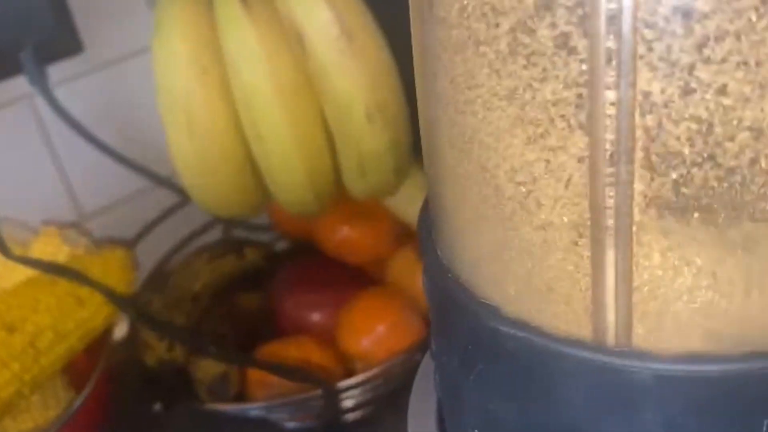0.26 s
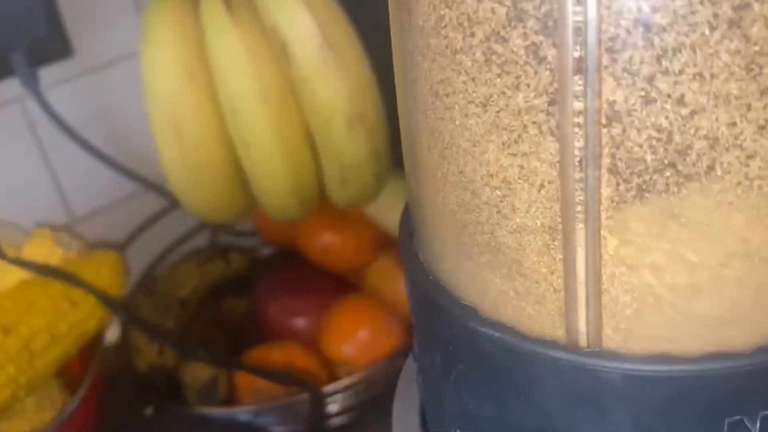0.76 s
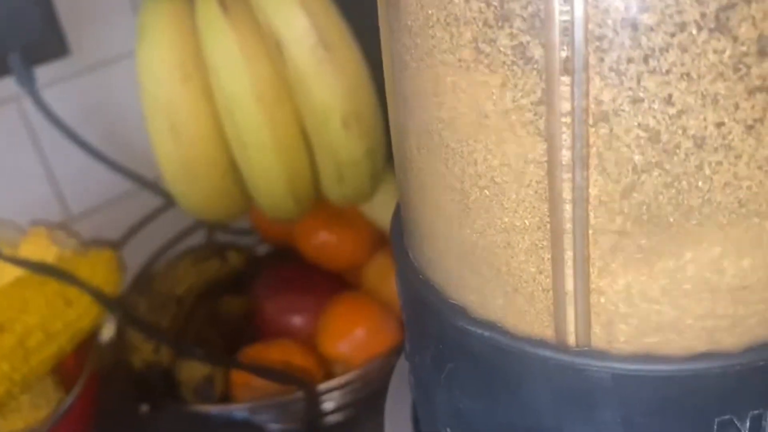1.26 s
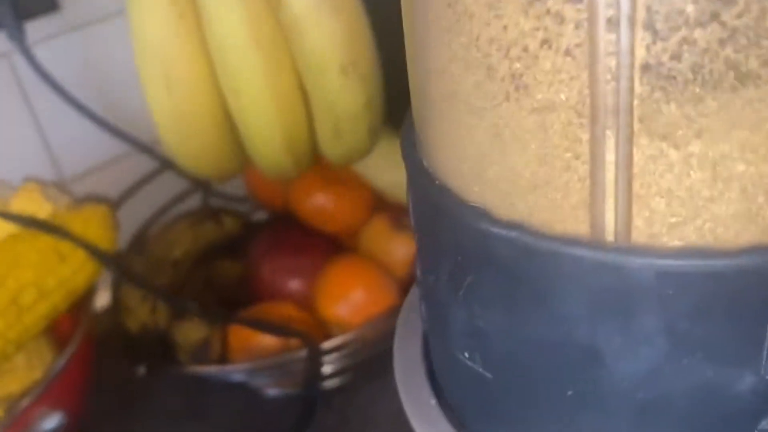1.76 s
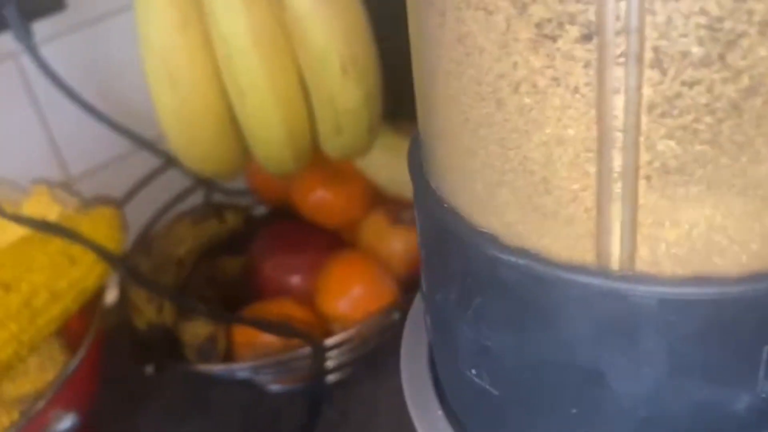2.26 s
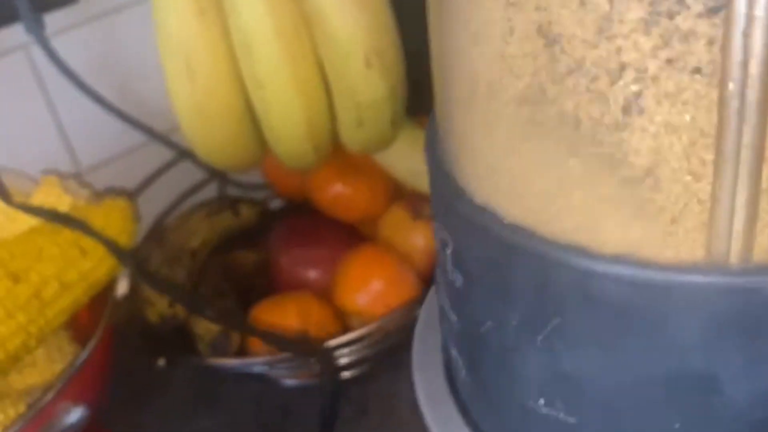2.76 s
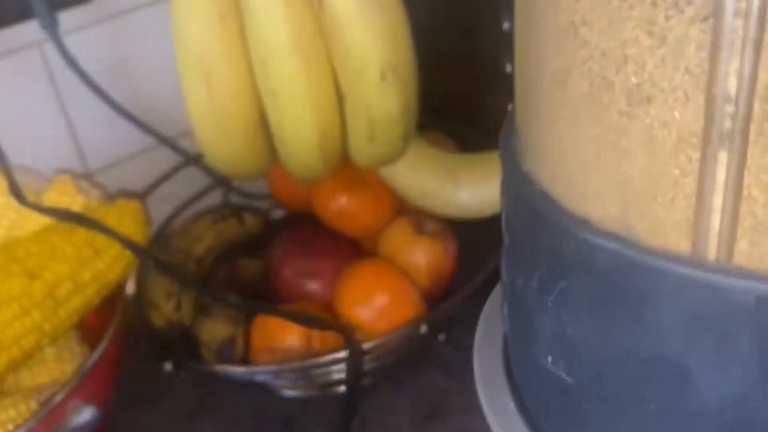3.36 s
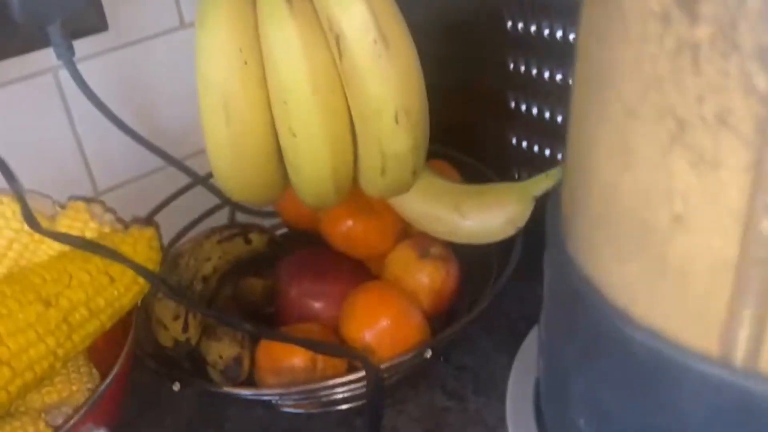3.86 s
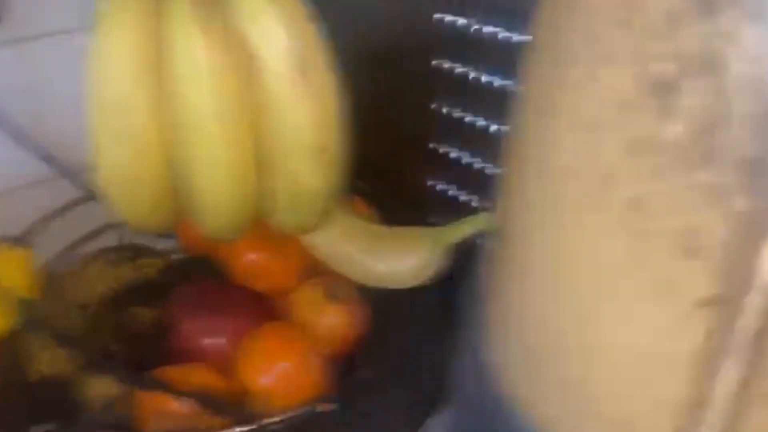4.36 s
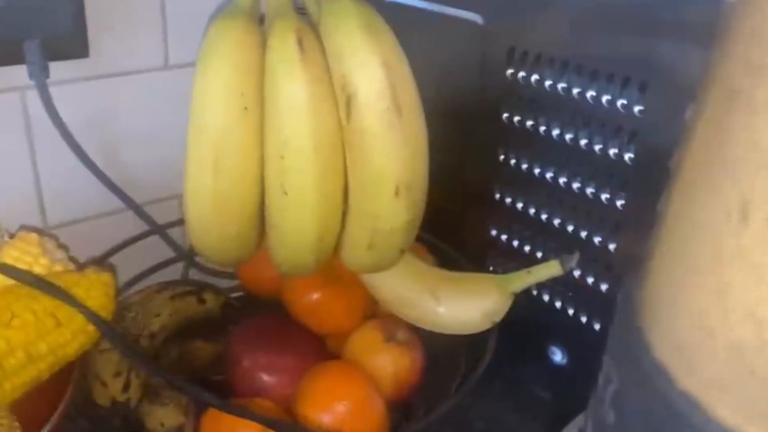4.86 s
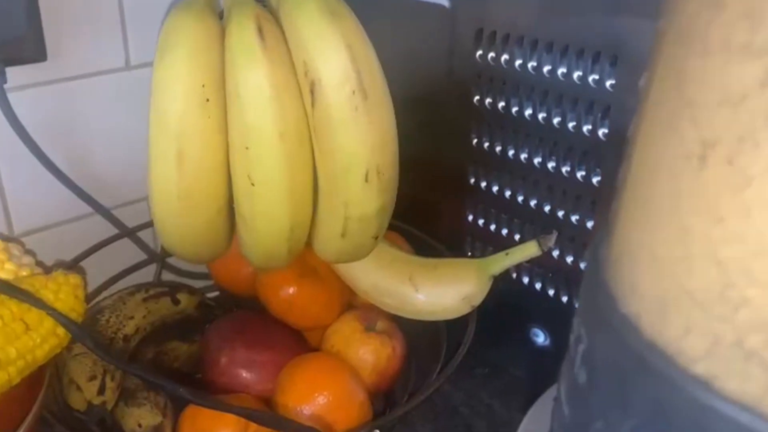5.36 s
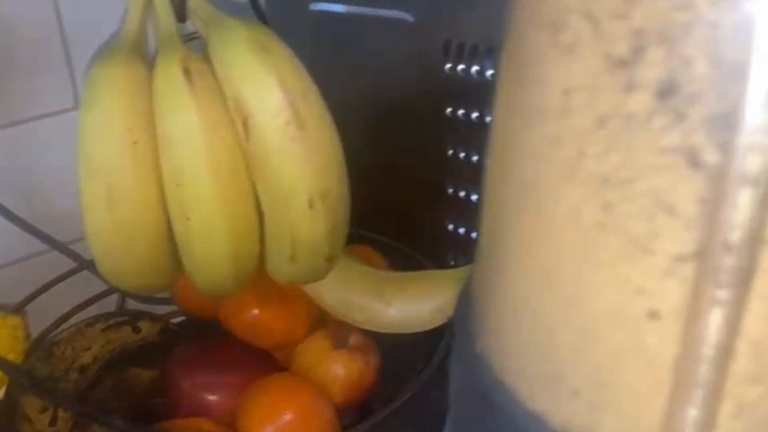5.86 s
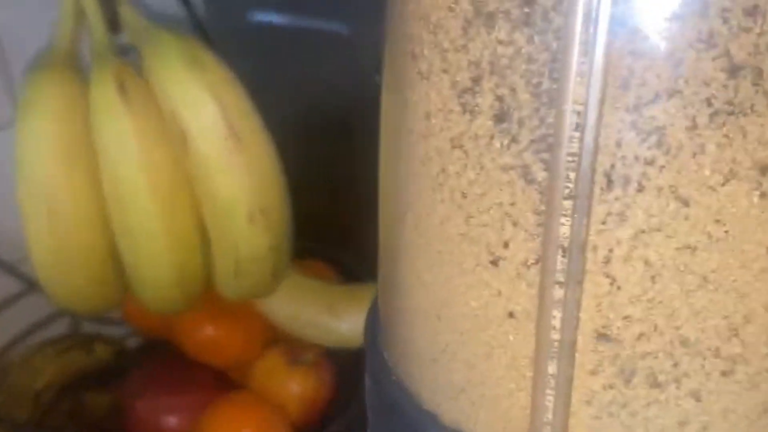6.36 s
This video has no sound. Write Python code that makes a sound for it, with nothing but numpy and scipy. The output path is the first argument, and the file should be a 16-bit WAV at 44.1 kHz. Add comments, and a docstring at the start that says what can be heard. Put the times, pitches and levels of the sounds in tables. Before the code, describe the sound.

Close by in a kitchen, a small blender grinds dry seeds. A steady mid-low motor hum with a thin whine sits under swishing powder, gritty spatter on plastic and sharp seed cracks. After about four seconds the power is cut; the pitch slides down, the grit thins, a bearing rattle emerges, and the cup knocks in its seat.

```python
"""A small blender grinds dry seeds on a kitchen counter, heard from close by.
The rotor hums and whines as tones locked to one rotor angle; powder swishes as coloured noise,
seeds crack, and surges of hard bits ring the plastic cup as random blows.
After four seconds the power is cut: the rotor coasts down and its tones sweep through resonances.
The cup knocks in its seat and noise judders on the rubber feet as the rotor slows."""
import sys
import numpy as np
from scipy import signal
from scipy.fft import rfft, irfft, next_fast_len
from scipy.io import wavfile

SR = 44100
rng = np.random.default_rng(int(sys.argv[2]) if len(sys.argv) > 2 else 0)


def wav_out(sig):
    """Save sig, one row per channel (or a flat mono array), as 16-bit PCM at SR to the path in sys.argv[1]."""
    wavfile.write(sys.argv[1], SR, np.round(np.clip(np.atleast_2d(sig).T, -1, 1) * 32767).astype(np.int16))


N = 292369
TIME = np.arange(N) / SR
CUT_S, DRIVE_FADE_S = 4.099, .105   # power cut, and time constant of the fading drive

# short rings of the plastic cup: (frequency [Hz], level [dB], t60 [s])
CUP_MODES = [(1985, -23, 0.013), (4720, -19, 0.0057), (5380, -11, 0.0028), (8100, -4, 0.00062),
             (9040, -2.5, 0.0024), (10570, -1.5, 0.0026), (10500, -9, 0.0077)]
# blade tone at two per turn, as at full speed: (time [s], level [dB], left over right [dB])
BLADE_TONE = [(0.0, -41, 4.0), (0.4, -36.5, 1.5), (1.47, -38, 1), (2.7, -36, 5.5), (2.75, -32, 9.0),
              (2.91, -36.5, 4), (3.66, -34, 0), (4.18, -38.5, 10), (4.2, -38, 4)]


def from_db(db):
    """Decibels to gain."""
    return 10 ** (np.asarray(db) / 20)


def rms_one(x):
    """Scale to unit rms."""
    return x / np.sqrt(np.mean(x ** 2) + 1e-20)


def in_time(rows):
    """Interpolate each table column over time, one curve per column."""
    time_s, *columns = np.transpose(rows)
    return [np.interp(TIME, time_s, column) for column in columns]


def at_hz(points, hz):
    """Read a (Hz, dB) table on a log-frequency axis, as a gain."""
    knots_hz, db = np.transpose(points)
    return from_db(np.interp(np.log(hz + 1), np.log(knots_hz), db))


def drift(corner_hz):
    """Smooth random wander of rms 1: noise through two equal poles, computed every 40 samples."""
    step, settle = 40, 2000
    r = np.exp(-2 * np.pi * corner_hz * step / SR)
    white = rng.standard_normal(N // step + settle + 2)
    slow = signal.lfilter([1], [1, -2 * r, r * r], white)[settle:]
    return np.interp(np.arange(N), step * np.arange(len(slow)), rms_one(slow))


def after_cut(fade_s):
    """1 while the power is on, then exponential decay."""
    return np.exp(-np.maximum(TIME - CUT_S, 0) / fade_s)


def resonance(hz, centre_hz, width_hz):
    """Bell of height 1; width_hz is its full width at half height."""
    return 1 / (1 + (2 * (hz - centre_hz) / width_hz) ** 2)


def panned(pan_db):
    """Left and right gains of constant power; positive pan_db favours the left."""
    ratio = from_db(np.atleast_1d(pan_db))
    return np.array([ratio, np.ones_like(ratio)]) * np.sqrt(2 / (1 + ratio ** 2))


def balance(loaded_pan_db, pace):
    """Left-right balance of the rotor tones, which moves to a fixed one as the rotor slows."""
    coasting_pan_db, speed_power = 1.5, 11
    return coasting_pan_db + (loaded_pan_db - coasting_pan_db) * pace ** speed_power


def noise(spectrum, alike):
    """Coloured stereo noise, rms 1; left-right likeness is one value or a table over frequency."""
    size = next_fast_len(N)
    hz = np.arange(size // 2 + 1) * SR / size
    if np.ndim(alike):
        alike = np.interp(hz, *np.transpose(alike))
    alike = np.clip(alike, -.9, .9)
    mid, side = rfft(rng.standard_normal((2, size))) * at_hz(spectrum, hz)
    ears = np.sqrt(1 + alike) * mid + np.sqrt(1 - alike) * side * [[1], [-1]]
    return rms_one(irfft(ears, size)[:, :N])


def stereo_tone(phase, pan_db, lead_rad):
    """A sine that leads in the right ear; rms 1 for the mean of both ears."""
    ears = panned(pan_db) * np.exp(1j * lead_rad * np.array([[0], [1]]))
    return np.sqrt(2) * np.real(ears / np.abs(ears.mean(axis=0)) * np.exp(1j * phase))


def wavering_tone(phase, flutter_db, smear_rad, corner_hz, lead_rad):
    """A tone whose strength and phase waver, a little differently in each ear; rms 1."""
    left, right, slip = drift(corner_hz), drift(corner_hz), drift(corner_hz)
    shift = smear_rad * np.array([slip + right / 2, slip + left / 2]) + [[0], [lead_rad]]
    strength = from_db(flutter_db * np.array([left, right]))
    return rms_one(strength * np.cos(phase + shift))


def strike(at, sizes, modes, spread_db):
    """Each blow rings each damped mode at a random strength, slightly higher in the right ear."""
    right_detune = 1.026
    out = np.zeros((2, N))
    for k, (hz, db, t60_s) in enumerate(modes):
        clicks = np.full(N, 1e-18)   # tiny offset keeps the filter out of denormals
        strength_db = db + spread_db * rng.standard_normal(len(at))
        clicks[at] = (-1) ** k * sizes * from_db(strength_db)
        r = from_db(-60 / (t60_s * SR))
        for ear, w in enumerate(2 * np.pi * hz / SR * np.array([1, right_detune])):
            out[ear] += signal.lfilter([0, np.sin(w)], [1, -2 * r * np.cos(w), r * r], clicks)
    return out


def hits(rows, modes, spread_db):
    """Play a (time [s], level [dB]) table of blows on a body."""
    time_s, db = np.transpose(rows)
    return strike((time_s * SR).astype(int), from_db(db), modes, spread_db)


def room():
    """Steady background noise, almost alike in both ears."""
    # background colour: (frequency [Hz], relative density [dB])
    room_colour = [(20, -27), (60, 16.5), (150, 7.5), (400, 22.5), (650, -32), (950, 2), (1500, -19),
                   (2050, 0), (3000, -2), (11000, -57)]
    return from_db(-55.5) * noise(room_colour, alike=0.97)


def kitchen(x, t60_s, wet_db):
    """Tiles and counter add a short diffuse tail, different in each ear."""
    t = np.arange(SR // 2) / SR
    tail = rng.standard_normal((2, len(t))) * from_db(-60 * t / t60_s) * (t > .002)
    tail /= np.sqrt(np.sum(tail ** 2, axis=1, keepdims=True))
    return x + from_db(wet_db) * signal.fftconvolve(x, tail, axes=1)[:, :N]


def knocks():
    """The cup knocks in its seat, and both ring low together."""
    # knocks: (time [s], level [dB])
    knock_rows = [(5.092, -42), (5.155, -32), (5.275, -34), (5.335, -49), (5.462, -49), (5.642, -38),
                  (5.657, -31)]
    # rings of cup and seat: (frequency [Hz], level [dB], t60 [s])
    seat_modes = [(204, -7, 0.27), (380, -13, 0.021), (930, 1, 0.11), (2070, -8, 0.023)]
    return hits(knock_rows, seat_modes, spread_db=1.0)


def feet(speed, pace):
    """Rubber feet judder most at their resonance; below it the machine rocks and sways."""
    # judder colour: (frequency [Hz], relative density [dB])
    judder_colour = [(20, -21), (45, -21), (75, 0.5), (120, -4), (190, 0), (260, -9.5), (380, 0),
                     (560, -17.5), (690, -24), (1050, -8), (1500, -22.5), (4000, -54)]
    loaded_db, peak_db, slow_db, sway_db = -55.5, -41.5, -46.5, -60
    judder_hz, width_hz = 220, 29   # turn rate of the strongest judder, softness of the change there
    below = .5 + .5 * np.tanh((judder_hz - speed) / width_hz)
    rocking = from_db(loaded_db + (slow_db - loaded_db) * below)
    peak = from_db(peak_db) * resonance(speed, judder_hz, 2 * width_hz) ** 2
    sway_band = signal.butter(2, [20, 55], "band", fs=SR, output="sos")
    sway = rms_one(signal.sosfilt(sway_band, rng.standard_normal(N)))
    sway_growth = ((1 - pace) / (1 - pace[-1])) ** 4
    judder = (rocking + peak) * noise(judder_colour, alike=0.94)
    return judder + from_db(sway_db) * sway_growth * sway


def powder(angle, pace, chop, patchy_db):
    """Meal swishes round the cup in clumps of uneven coarseness, pushed twice a turn by the blades."""
    # swish colour: (frequency [Hz], relative density [dB])
    swish_colour = [(60, -49), (130, -21), (400, 1), (500, -10), (570, -5.5), (660, -6), (830, 2.5),
                    (1050, -1.5), (1350, 0), (1700, -2.5), (1950, 7), (2150, 3.5), (2700, 4), (3000, -1.5),
                    (3400, -4), (3900, -3), (5800, -2), (6800, -13), (8400, -8.5), (11000, -39)]
    # left-right likeness: (frequency [Hz], likeness [-1 to 1])
    swish_likeness = [(400, 0.6), (580, 0.27), (800, -0.012), (1500, 0.92), (1900, 0.16), (2300, 0.7),
                      (3000, -0.16), (4300, 0.73), (6800, -0.23)]
    start_db, rise_db_per_s, speed_power = -37.5, 0.5, 1.09   # rises as the meal gets finer
    settle_db, settle_s = -0.5, 0.11   # the meal settles once the drive stops
    level_db = start_db + rise_db_per_s * np.minimum(TIME, CUT_S)
    level_db = level_db + settle_db * (1 - after_cut(settle_s))
    blade_db, _ = in_time(BLADE_TONE)
    level_db = level_db + 0.1 * (blade_db - blade_db.mean())   # follows a share of the blade's swing
    clumps_db = .2 * drift(28) + .7 * drift(150)
    meal = noise(swish_colour, alike=swish_likeness)
    patches = 0
    edges_hz = np.geomspace(900, 7000, 7)
    for band_hz in zip(edges_hz, edges_hz[1:]):
        band = signal.butter(1, band_hz, "band", fs=SR, output="sos")
        patches = patches + signal.sosfilt(band, meal) * (from_db(patchy_db * drift(15)) - 1)
    swish = rms_one(meal + patches) * (1 + chop * np.cos(2 * angle))
    return from_db(level_db + clumps_db) * pace ** speed_power * swish * panned(1.8)


def spray_level(speed):
    """Surges ride on a steady spray, which fails when the rotor is too slow to fling the bits."""
    # the heap slumps onto the blade and bits fly out: (time [s], level [dB], length [s])
    surge_rows = [(0.125, -33.5, 0.16), (0.338, -37, 0.16), (0.513, -35, 0.13), (0.706, -36.5, 0.16),
                  (0.924, -36.5, 0.13), (1.063, -40.5, 0.11), (1.284, -36, 0.18), (1.506, -34, 0.074),
                  (1.637, -34.5, 0.1), (1.878, -35, 0.12), (2.043, -36.5, 0.16), (2.305, -36.5, 0.087),
                  (2.6, -36, 0.18), (2.915, -38, 0.24), (3.172, -40, 0.094), (3.393, -37, 0.16),
                  (3.627, -40.5, 0.13), (3.78, -37.5, 0.13), (4.098, -38, 0.18), (4.313, -38.5, 0.082),
                  (4.483, -38, 0.056)]
    loaded_db, coasting_db = -43, -41   # the heap collapses after the cut
    fling_turns_per_s, steepness = 180, 3.8
    steady_db = coasting_db + (loaded_db - coasting_db) * after_cut(0.19)
    power = from_db(steady_db) ** 2
    for time_s, db, length_s in surge_rows:
        power = power + from_db(db) ** 2 * np.exp(-(2 * (TIME - time_s) / length_s) ** 2)
    return np.sqrt(power / (1 + (fling_turns_per_s / speed) ** (2 * steepness)))


def grit(angle, speed, per_turn, size_db, bunching, flicker_db):
    """Hard bits hit the cup at random, densest once a turn; a few are much larger than the rest."""
    chance = per_turn * speed * (1 + bunching * np.cos(angle)) / SR
    at = np.flatnonzero(rng.random(N) < chance)
    sizes = from_db(size_db * np.minimum(rng.exponential(1, len(at)), 5))
    sizes = sizes * rng.choice([-1, 1], len(at))
    ticks = rms_one(strike(at, sizes, CUP_MODES, spread_db=2.0)[0])
    near = spray_level(speed) * from_db(flicker_db * drift(18)) * ticks
    far_lag = round(.000293 * SR)
    return np.array([near, np.pad(near, (far_lag, 0))[:N]])


def seeds():
    """A seed splits on the blade with a bright snap and rings the cup."""
    # cracks: (time [s], blow level [dB])
    crack_rows = [(0.1387, -8.5), (0.522, -5.5), (1.0264, -9.5), (1.040, -14), (1.252, -7.5), (1.439, -9),
                  (1.6457, -16), (1.7914, -13), (1.847, -9), (1.871, -11), (2.4942, -19), (2.681, -13),
                  (3.641, -7), (4.142, -14), (4.455, -7.5), (5.6442, -13.5), (5.988, -24)]
    snap_db, snap_edge_hz = -21, 4470   # snap level relative to the blow, lower edge
    time_s, db = np.transpose(crack_rows)
    clicks = np.zeros(N)
    clicks[(time_s * SR).astype(int)] = from_db(db + snap_db)
    highpass = signal.butter(2, snap_edge_hz, "high", fs=SR, output="sos")
    snaps = signal.sosfilt(highpass, clicks + 1e-18)
    return snaps + hits(crack_rows, CUP_MODES, spread_db=1.5)


def bearing(angle, speed, pace):
    """Ball tones flare as they glide through resonances of the base, over a rolling rasp."""
    # ball tones and sidebands: (multiple of turn rate, level before the base [dB])
    ball_tones = [(3.0, -18), (3.57, -22), (4.0, -20), (4.43, -26), (5.0, -25), (5.3, -28), (7.0, -19),
                  (7.8, -28), (9.0, -36), (10.43, -35), (10.67, -37), (11.0, -36), (12.15, -44),
                  (13.2, -42), (13.82, -42), (14.22, -42), (14.56, -41), (15.3, -47), (15.6, -42),
                  (16.07, -47), (16.63, -44), (17.27, -45), (17.5, -32), (17.7, -39), (18.0, -41),
                  (18.16, -39), (18.5, -36.5), (18.66, -39), (20.89, -39), (21.57, -42), (21.89, -36),
                  (22.05, -39), (22.55, -41), (22.88, -34), (23.04, -41), (23.37, -43), (25.27, -46),
                  (25.88, -47), (26.06, -48), (26.3, -41), (26.45, -45), (26.62, -43), (27.27, -51),
                  (28.69, -47), (29.33, -51), (30.61, -48), (31.85, -49), (32.29, -48), (34.0, -51),
                  (35.06, -46), (35.41, -43), (35.68, -46), (35.95, -45), (37.3, -50), (38.5, -48),
                  (39.45, -46)]
    # radiation of the motor base: (frequency [Hz], gain [dB])
    base_response = [(480, -40), (570, -35), (660, -45), (760, -35), (860, -30), (935, -28), (1040, -26),
                     (1200, -31), (1550, -38), (1900, -27), (2330, -19), (2700, -23), (3100, -20),
                     (3500, -16), (3900, -22), (4200, -16), (4450, -1), (4650, -3.5), (4950, -8),
                     (5150, -25), (5900, -39), (6330, -9), (6650, -43)]
    # rasp colour: (frequency [Hz], relative density [dB])
    rasp_colour = [(900, -28), (3600, -33), (4100, -49), (4400, 17.5), (4700, 11), (5000, 12), (5400, -47),
                   (6300, 6), (7200, -37), (11000, -23)]
    # held tight under load, the bearing rattles freely without it
    free_db, play_opens_s, speed_power = -.5, 0.42, 0.15
    rasp_tight_db, rasp_free_db, rasp_loosen_s = -46.5, -38.5, 0.98
    play = from_db(free_db) * (1 - after_cut(play_opens_s)) * pace ** speed_power
    rasp_db = rasp_free_db + (rasp_tight_db - rasp_free_db) * after_cut(rasp_loosen_s)
    tones = 0
    for order, db in ball_tones:
        smear_rad = .25 + .012 * order   # skidding balls blur the higher tones more
        tone = wavering_tone(order * angle, flutter_db=2.0, smear_rad=smear_rad, corner_hz=20, lead_rad=.7)
        tones = tones + from_db(db) * at_hz(base_response, order * speed) * tone
    tones = tones * rms_one(from_db(2.5 * drift(16)))   # roughness of skidding, shared by all tones
    rasp = from_db(rasp_db) * pace ** 0.33 * noise(rasp_colour, alike=-0.44)
    rasp = rasp * (1 + 0.11 * np.cos(angle))
    return (play * tones + rasp) * panned(5.3)


def whine(angle, ripple):
    """Tones under power flutter, swell and throb with the mains, then die away after the cut."""
    # motor and bearing whine, and a mains sideband of the hum: (multiple of turn rate,
    # level at start [dB], rise [dB/s], lead of right ear [rad], slow swell [dB])
    powered_tones = [(1.275, -59, 0, .5, 1), (2.61, -49.5, 0, .7, 1), (3, -46.5, .6, 1.3, .5),
                     (4, -55, 1.1, -.5, 1.5), (5, -47.3, -.5, .9, .7), (7.015, -51.5, 2.2, -.2, .7),
                     (9, -61, 0, 2.7, 2), (10, -52.5, -2.2, -2.9, 2), (10.31, -55.5, .8, -.2, 3),
                     (11, -53.5, -.6, -2.8, 2), (12.03, -54.5, .3, -.7, 2), (13.2, -46.5, -.8, -.9, 1),
                     (17.48, -61, 1, -1.2, 2.5), (22, -65, .8, 3.1, 2.5)]
    mains_hz, mains_db, fade_s = 100.2, -61, 0.13
    powered_s = np.minimum(TIME, CUT_S)
    mains = np.sin(2 * np.pi * mains_hz * TIME) * after_cut(DRIVE_FADE_S)
    tones = 0
    for order, db, rise_db_per_s, lead_rad, swell_db in powered_tones:
        swell = rms_one(from_db(swell_db * drift(3.1)))
        tone = wavering_tone(order * angle, flutter_db=2.25, smear_rad=0.22, corner_hz=8.2,
                             lead_rad=lead_rad)
        tones = tones + from_db(db + rise_db_per_s * powered_s) * swell * tone
    tones = after_cut(fade_s) * tones * (1 + ripple * mains) * panned(0.87)
    return tones + from_db(mains_db) * mains


def blades(angle, speed, pace, lead_rad, flutter_db, wobble_db, shake_db):
    """Two blades sound twice a turn; the falling tone shakes and flares at each resonance it crosses."""
    # narrow resonances: (frequency [Hz], level [dB], left over right [dB])
    flare_rows = [(600, -41, 10), (574.6, -32.5, 0), (546, -31.5, 7), (507, -37.5, -4), (470, -32.5, -19),
                  (460.4, -33, -14), (430.5, -37, 16), (418, -36, 4), (399, -41, 1), (379.4, -40.5, 4),
                  (362, -38, 0), (326, -46, 0)]
    width_hz, speed_power = 21, 3.9
    level_db, pan_db = in_time(BLADE_TONE)
    flares = 0
    for k, (hz, db, side_db) in enumerate(flare_rows):
        bell = resonance(2 * speed, hz, width_hz) ** 2
        flares = flares + (-1) ** k * from_db(db) * panned(side_db) * bell
    wobble = from_db(wobble_db * (1 - pace) * np.array([drift(28), drift(23)]))
    steady = from_db(level_db) * pace ** speed_power * wobble
    steady = steady * stereo_tone(2 * angle, balance(pan_db, pace), lead_rad)
    shake = from_db(shake_db * drift(40))
    ringing = flares * shake * stereo_tone(2 * angle + np.pi / 2, 0, lead_rad)
    return -from_db(flutter_db * drift(30)) * (steady + ringing)


def hum(angle, speed, pace, wobble_db):
    """The unbalanced rotor hums once a turn; slowing, it fades, wobbles and swells on the feet."""
    # hum as at full speed, before the feet: (time [s], level [dB], left over right [dB])
    hum_rows = [(0.0, -26, 9), (0.19, -26, 7.0), (0.49, -29, 13.0), (1.04, -27, 9), (1.24, -28.5, 11.5),
                (1.92, -27, 12), (2.09, -26, 7.5), (2.7, -29, 16), (2.76, -33.5, 23.0), (2.83, -29.5, 11),
                (2.92, -28.5, 16.0), (2.98, -26.5, 10), (3.22, -30, 14.5), (3.37, -28.5, 8.5),
                (3.92, -28, 12), (4.2, -26.5, 12.0), (4.45, -27.5, 21), (4.75, -25.5, 28)]
    # lead of the right ear as the listener moves: (time [s], lead [rad])
    lead_rows = [(2.45, 0.47), (2.7, 1.34)]
    speed_power, feet_hz, feet_width_hz, feet_gain = 3.03, 214, 39, 1.3
    level_db, pan_db = in_time(hum_rows)
    lead_rad, = in_time(lead_rows)
    bounce = 1 + feet_gain * resonance(speed, feet_hz, feet_width_hz)
    wobble = from_db(wobble_db * (1 - pace) * np.array([drift(8.1), drift(39)]))
    level = from_db(level_db) * pace ** speed_power * bounce * wobble
    return level * stereo_tone(angle, balance(pan_db, pace), lead_rad)


def coasting():
    """Share of working speed left: exponential drag, and extra drag late, once the rotor has slowed well down."""
    coast_s, extra_from_s, extra_drag_s = 2.0455, 6.15, 3.3
    unpowered_s = np.maximum(TIME - CUT_S, 0) - DRIVE_FADE_S * (1 - after_cut(DRIVE_FADE_S))
    extra = (np.maximum(TIME - extra_from_s, 0) / extra_drag_s) ** 2   # the grease drags as well
    return np.exp(-unpowered_s / coast_s - extra)


def scene():
    """One rotor angle drives the motor, bearing, blades, powder and grit."""
    # rotor speed before coasting: (time [s], speed [turns/s])
    speed_rows = [(0, 364.3), (.2, 364), (.45, 367), (.62, 365.7), (.72, 366.4), (1, 365.3), (1.5, 367.6),
                  (1.68, 364.9), (1.85, 367.8), (1.97, 365.3), (2.14, 364.5), (2.26, 366.6), (2.36, 364.3),
                  (2.57, 368), (2.72, 365.2), (2.83, 367.7), (3.04, 365.5), (3.3, 368.1), (3.55, 367.5),
                  (3.82, 365.4), (3.96, 366.8), (4.06, 365.5)]
    pace = coasting()
    tug = 1 + .0008 * drift(9)   # the uneven load tugs at the rotor
    speed = in_time(speed_rows)[0] * pace * tug
    angle = 2 * np.pi * np.cumsum(speed) / SR
    spray = grit(angle, speed, per_turn=16.0, size_db=1.8, bunching=.6, flicker_db=1.5)
    blows = kitchen(spray + seeds() + knocks(), t60_s=.15, wet_db=-15)
    swish = powder(angle, pace, chop=0.047, patchy_db=2.0)
    body = feet(speed, pace) + bearing(angle, speed, pace) + whine(angle, ripple=0.038)
    motor = hum(angle, speed, pace, wobble_db=4.5)
    motor = motor + blades(angle, speed, pace, lead_rad=-0.89, flutter_db=0.97, wobble_db=8, shake_db=1.2)
    return room() + blows + swish + body + motor


def record(dry):
    """A steep elliptic low-pass cuts the top at 11.7 kHz."""
    return signal.sosfilt(signal.ellip(10, .2, 80, 11700, fs=SR, output="sos"), dry)


dry = scene()
out = record(dry)
wav_out(out)
```